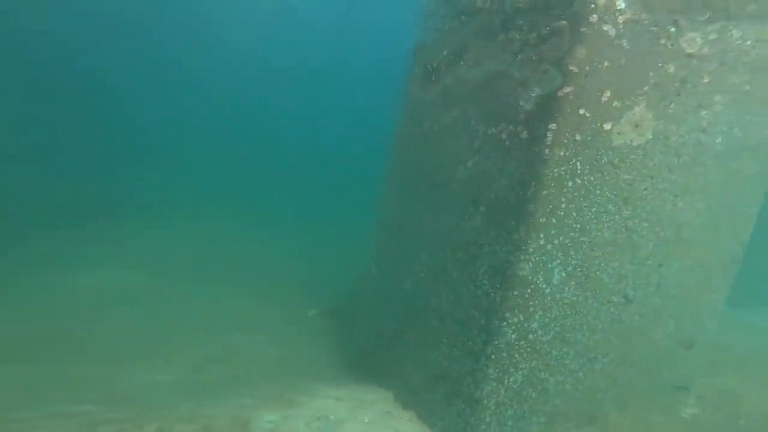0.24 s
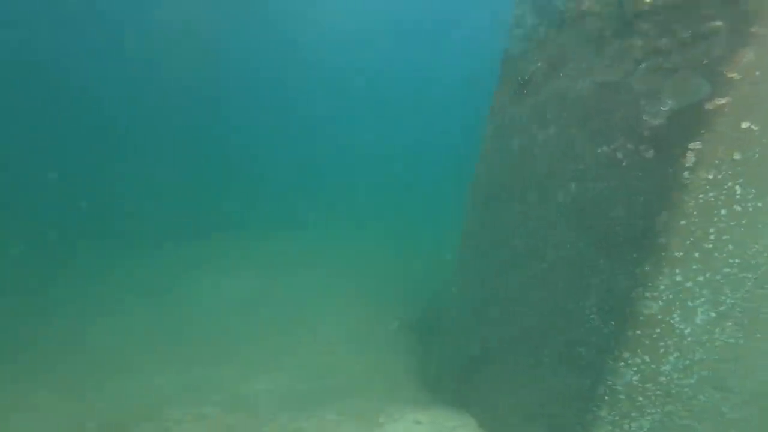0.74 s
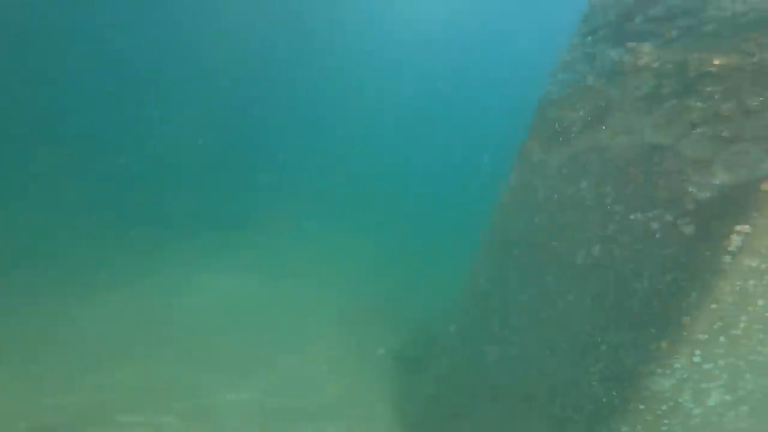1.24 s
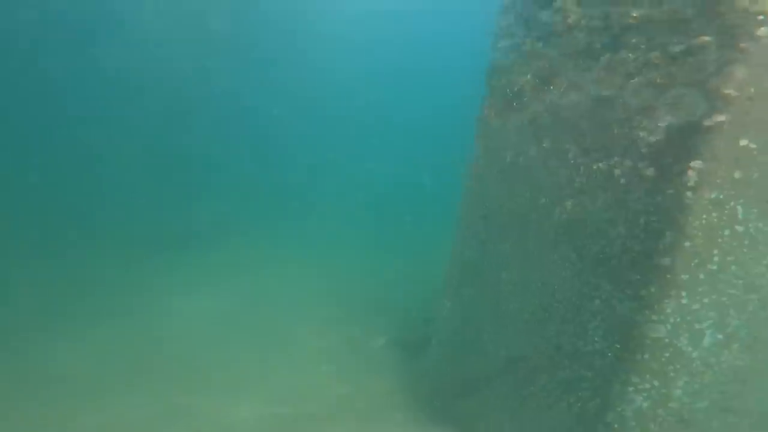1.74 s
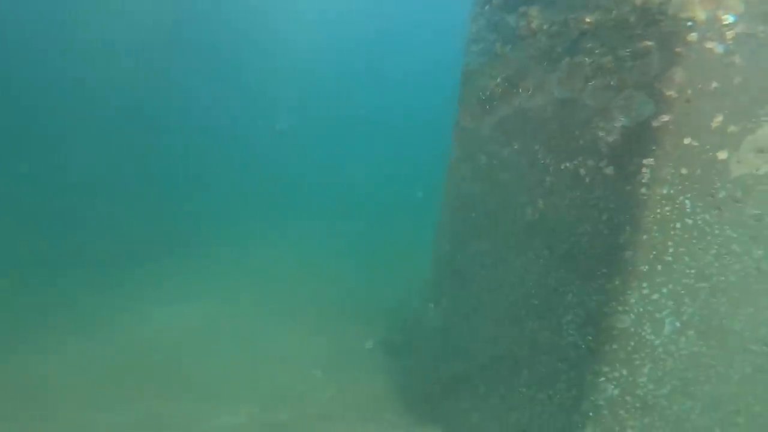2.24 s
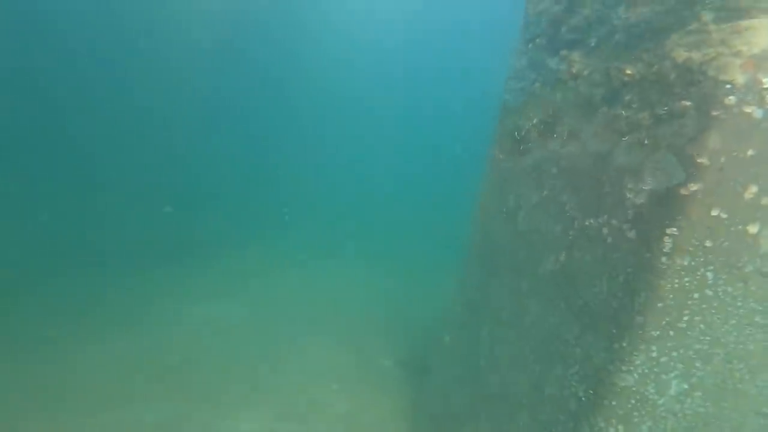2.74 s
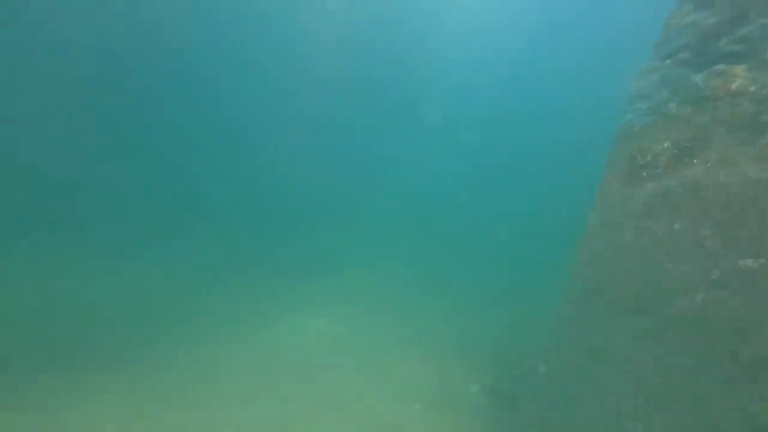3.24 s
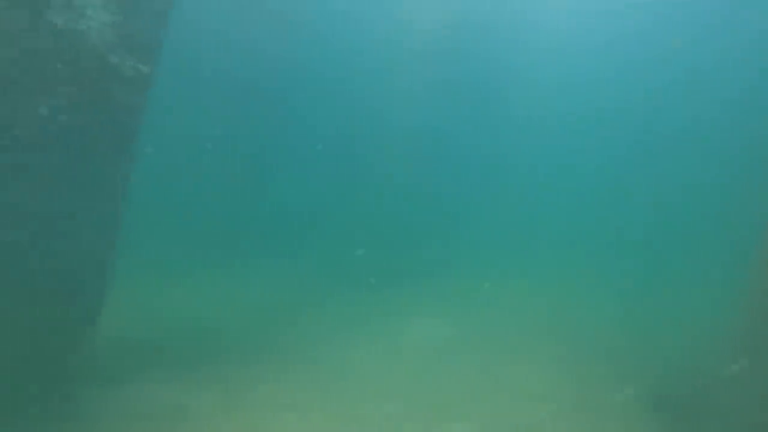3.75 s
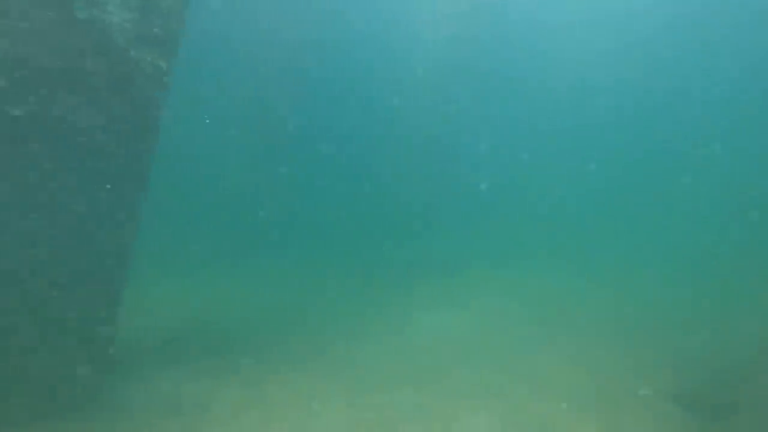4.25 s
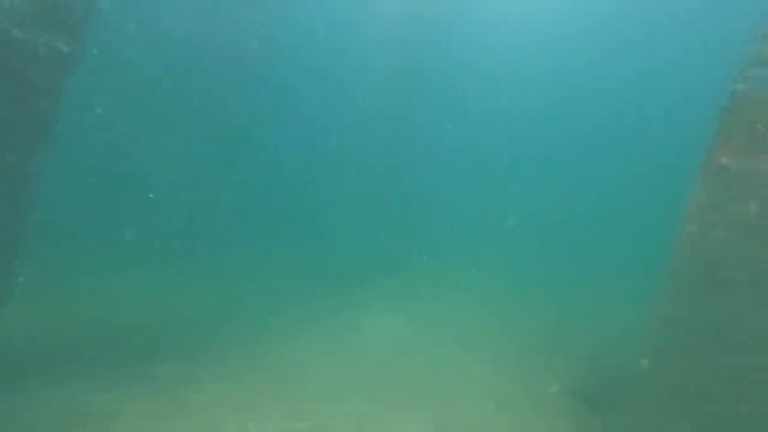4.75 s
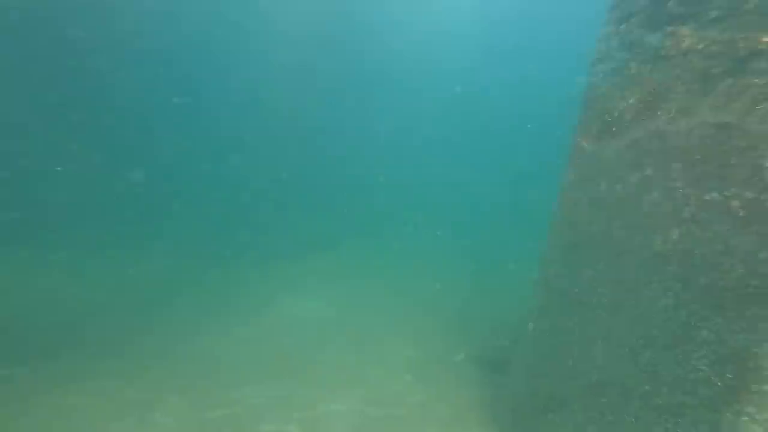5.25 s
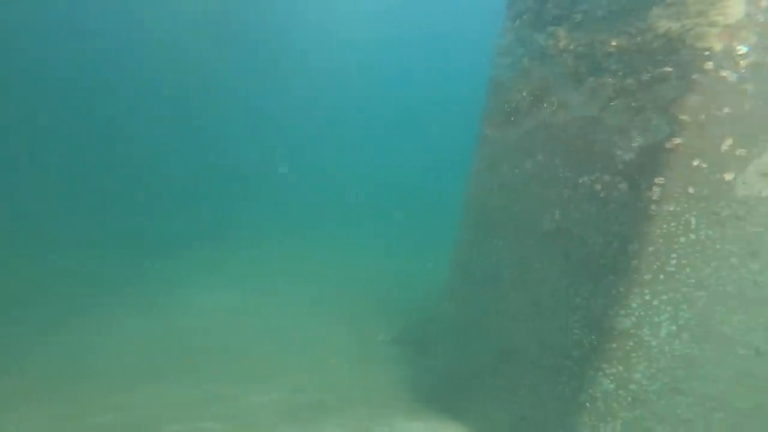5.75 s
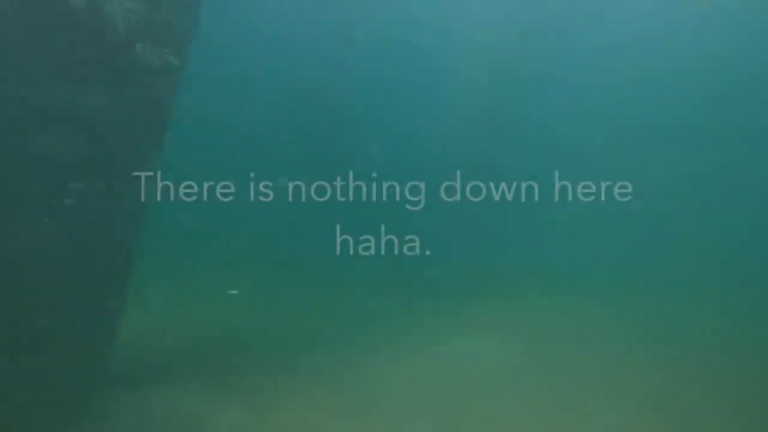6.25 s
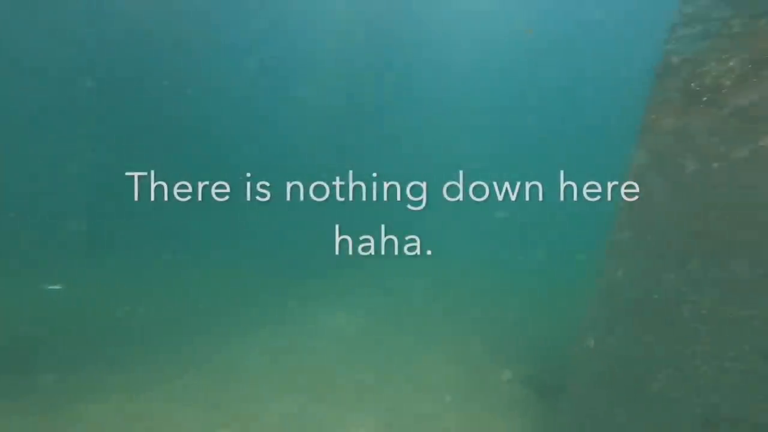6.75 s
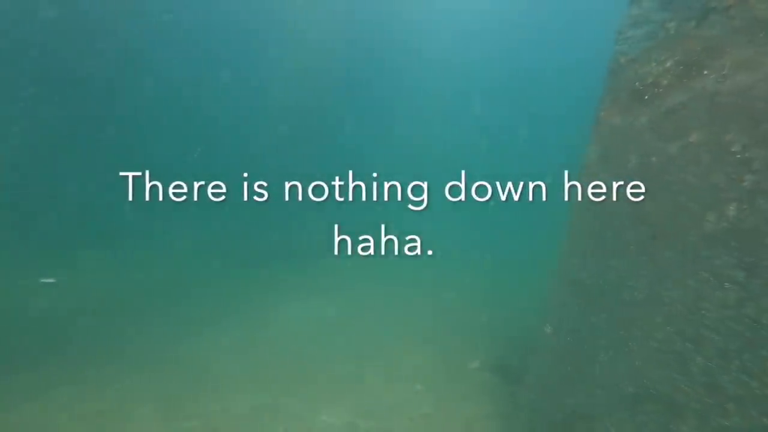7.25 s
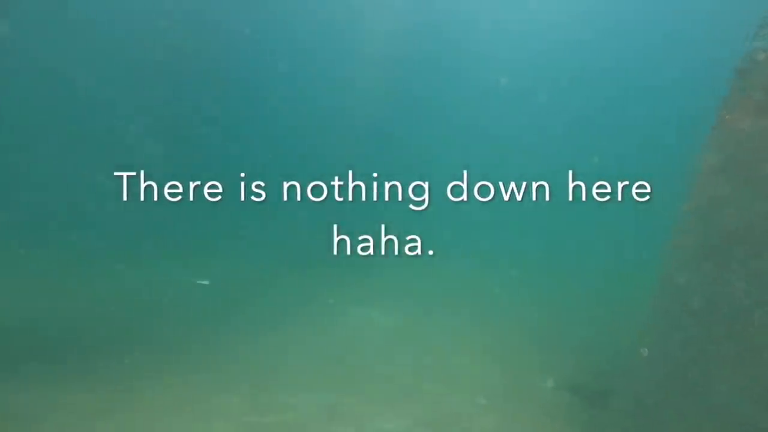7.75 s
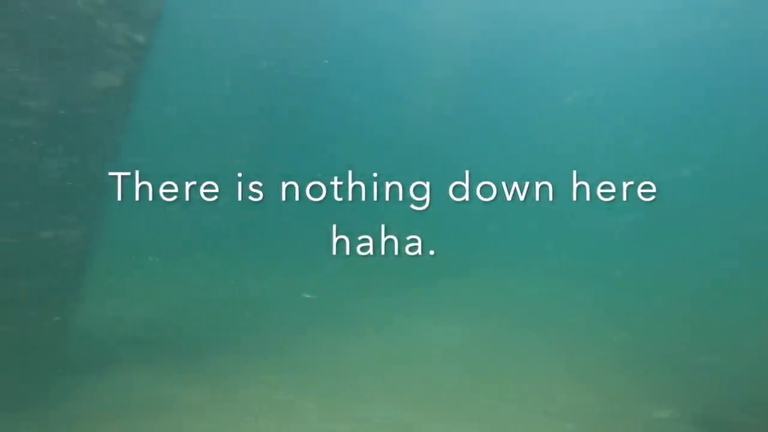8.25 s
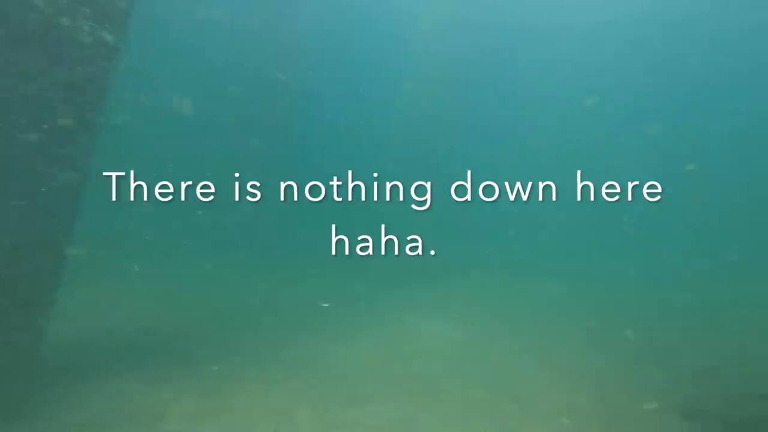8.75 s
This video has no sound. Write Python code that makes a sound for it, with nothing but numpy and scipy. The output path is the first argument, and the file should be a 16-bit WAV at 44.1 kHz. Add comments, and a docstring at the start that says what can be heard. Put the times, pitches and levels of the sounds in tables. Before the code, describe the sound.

Snapping shrimp crackle irregularly over a dull underwater hum, while occasional hollow knocks ring from a pier pile and water thumps the microphone.

```python
"""Under water beside a pier pile, heard from inside a small camera's flooded housing.
Snapping shrimp crack near and far, each impulse trailing echoes off piles, sand and surface,
and distant snaps and waves merge into a drone and a hiss. Dull knocks excite the modes of the pile,
and the swell presses on the ports. The housing acts as a filter: it muffles the sound and gives
each of three microphones its own colour and delay."""
import sys
import numpy as np
from scipy import signal
from scipy.fft import rfft, irfft, next_fast_len
from scipy.io import wavfile
from scipy.ndimage import uniform_filter1d, map_coordinates

SR = 44100
rng = np.random.default_rng(int(sys.argv[2]) if len(sys.argv) > 2 else 0)


def transcribe(u):
    """Save the signal u as a 16-bit wav file named by the first command-line argument.

    u: samples, shape (n,) or (channels, n), limited to [-1, 1]; the rate is SR.
    q: integer samples, one column per channel.
    """
    v = np.clip(np.atleast_2d(u).T, -1, 1)
    q = np.round(v * 32767).astype(np.int16)
    wavfile.write(sys.argv[1], SR, q)


N = 396900  # 9 s

# Response of the housing. Each row: frequency in Hz, left gain in dB, right gain in dB,
# phase lead of right over left in radians, gain of the third microphone in dB.
HOUSING = [(101, -11.5, -23.5, 0.22, -6), (285, -6.5, -19, 0.46, -7.5), (439, 7.5, -10.5, 3.87, 2.5),
           (550, -0.5, -8, 3.98, -2), (722, 0, -0.5, 4.62, -14.5), (862, -14, -8.5, 4.16, -17.5),
           (1105.4, -26, -25, 9.34, -29), (1375, -36.5, -30, 12.1, -31.5), (1520, -38.5, -38, 11.56, -30.5),
           (1740, -41, -29.5, 10.4, -39.5), (2090, -37, -39.5, 11.7, -41), (2410, -47.5, -38.5, 12, -52),
           (2770, -58, -43.5, 9.6, -40.5), (3500, -46, -40.5, 11.34, -46), (3900, -47.5, -36, 9.5, -43.5),
           (4640, -59.5, -45, 14.3, -45.5), (5700, -52.5, -62, 14.65, -48.5),
           (7700, -68.5, -63.5, 15.4, -54.5), (9300, -75, -73, 16, -60.5), (12900, -82.5, -75.5, 36, -76.5)]
# Lag of the third microphone behind the right. Each row: frequency in Hz, phase in radians.
THIRD_PHASE_LAG = [(130, -2), (430, 2.5), (700, 2.5), (1150, 7.5), (3000, 5.5), (12000, 7.5)]
# Crossfade from the ports to the sheltered third microphone. Each row: time in seconds, share from 0 to 1.
THIRD_SHARE = [(0, 0.09), (3.75, 0.14), (4.1, 0.85), (4.5, 0.77), (4.7, 0.75), (5.3, 0.57), (6.05, 0.53),
               (6.15, 0.18), (9, 0.14)]
# Distant water. Each row: time in seconds, drone level in dB, hiss level in dB.
FAR_WATER = [(0.0, -46.5, -65), (0.3, -45, -72), (2.23, -50.5, -68), (2.68, -46.5, -70.5), (3.46, -44, -70),
             (4.64, -49.5, -72), (4.79, -49, -67.5), (5.91, -47, -73), (6.19, -49, -70), (6.52, -49, -70.5),
             (8.67, -44, -69.5), (9.0, -46, -68.5)]
# Swell on the ports. Each row: time in seconds, level of the louder side in dB, left minus right in dB.
SWELL_LEVELS = [(0.0, -74, 4), (0.68, -74, 4.5), (0.97, -78.5, -16.5), (2.48, -78, 19.5), (3.06, -77, 8),
                (3.33, -60, 24), (3.53, -43.5, 24), (3.93, -74.5, 3.5), (9.0, -84, 4.5)]
# Pressure spectrum of the swell. Each row: frequency in Hz, relative spectral density in dB.
SWELL_SPECTRUM = [(12, -36.5), (20, 8), (38, 1), (59, 5), (75, -15.5), (140, -6.5), (180, -50.5),
                  (310, -120)]
# Water bumping the housing. Each row: start in seconds, level in dB, frequency in Hz, T60 in seconds.
WATER_BUMPS = [(0.971, -33, 27.6, 0.17), (1.199, -47.5, 90, 0.26), (1.606, -40.5, 108.5, 0.38),
               (2.513, -44, 76, 0.13), (2.679, -48.5, 35, 0.34), (3.043, -31.5, 105, 0.13),
               (3.396, -19, 45.7, 0.26), (3.462, -9, 56.4, 0.078), (3.708, -33, 46, 0.19),
               (4.097, -41.5, 120, 0.24), (5.276, -39, 92.3, 0.3), (5.928, -37, 116, 0.083),
               (6.029, -29.5, 144, 0.066), (6.334, -24.5, 100, 0.12), (6.404, -30.5, 90, 0.29),
               (7.819, -40.5, 109, 0.12)]
# Modes of the pile. Each row: frequency in Hz, relative level in dB, T60 in seconds.
PILE_MODES = [(188.4, 1, 0.079), (225.4, -3, 0.073), (276.4, -5.5, 0.12), (338.4, 2.5, 0.045),
              (391.6, 7.5, 0.048), (423.8, 1.5, 0.089), (448.8, 5, 0.092), (593, 13, 0.058),
              (686, 19.5, 0.028), (787, 11.5, 0.036)]
# Knocks in the pier. Each row: start in seconds, level in dB, pitch in Hz.
PIER_KNOCKS = [(0.43, -23.5, 230), (1.595, 1, 347), (1.604, -7, 444), (1.614, -7.5, 437),
               (1.641, -23.5, 438), (1.643, -16.5, 270), (1.994, -26.5, 329), (2.529, -26.5, 389),
               (3.917, -17, 375), (3.921, -26.5, 189), (4.001, -18.5, 394), (4.316, -26.5, 457),
               (5.261, 0.5, 435.4), (5.28, -5, 289), (5.296, -5.5, 275), (5.312, -14.5, 402),
               (6.313, 2, 409.4), (6.316, -10.5, 326), (6.328, -7.5, 350), (6.343, -12, 445),
               (6.35, -16.5, 303.6), (7.917, -18, 407), (7.921, -16, 210.8), (7.953, -17.5, 336)]
# Near snaps. Each row: start in seconds, base level of the edge (above about 2.5 kHz) in dB,
# level of the middle (about 1-2.5 kHz) in dB relative to the edge.
NEAR_SNAPS = [(0.0358, -54.5, 5.5), (0.0912, -49, -5), (0.1376, -55, 7.5), (0.1958, -48, -1),
              (0.2234, -52, -7), (0.2782, -57, -16.5), (0.4815, -52, -4), (0.5439, -51.5, -2.5),
              (0.702, -45, -4), (0.741, -51, 0), (0.8178, -43, 1.5), (1.0138, -56, 3.5), (1.0985, -57, 6),
              (1.1298, -58.5, -11), (1.179, -56, -12.5), (1.263, -52.5, -4.5), (1.225, -56, 0),
              (1.2407, -47.5, -3.5), (1.319, -51.5, 0.5), (1.428, -64, 9), (1.4497, -46, 9),
              (1.5028, -46.5, -2), (1.5731, -45.5, 1), (1.6123, -44.5, -1.5), (1.7894, -54.5, 9.5),
              (1.8426, -64.5, 14), (1.8834, -61, 4.5), (1.9337, -56.5, -0.5), (1.963, -57, -17.5),
              (1.9985, -47.5, 3), (2.0195, -53.5, 10), (2.0452, -46, 5), (2.093, -57.5, 11.5),
              (2.153, -54.5, 11), (2.1791, -48, -9), (2.2792, -45, 3), (2.303, -49.5, -9), (2.359, -57, 10),
              (2.4161, -46.5, 4), (2.4988, -49.5, 5.5), (2.5566, -42.5, -5.5), (2.6688, -53.5, -10.5),
              (2.7776, -58, -2.5), (2.809, -45, -1.5), (2.8545, -45, 1.5), (2.9748, -52.5, 5.5),
              (2.9992, -45, -2.5), (3.0608, -54, 6.5), (3.1599, -54, 3.5), (3.2449, -62, 12.5),
              (3.266, -55.5, 6.5), (3.3935, -50, -13.5), (3.4152, -47.5, 0.5), (3.448, -51, 2.5),
              (3.5058, -58, 1.5), (3.5608, -50, -1.5), (3.6643, -51.5, 0), (3.768, -54.5, 6.5),
              (3.7784, -46, -9), (3.8106, -52, -2), (3.8286, -51, 1), (3.9422, -50, -3.5), (3.977, -52, -7),
              (4.0207, -56, 2), (4.0774, -51.5, -7), (4.0974, -41.5, 3), (4.1325, -64.5, 3),
              (4.254, -67, 7), (4.2774, -59, 2.5), (4.2904, -54, 1), (4.3222, -52, 8.5),
              (4.3734, -46.5, -6.5), (4.633, -60, 9.5), (4.664, -60.5, 0), (4.679, -47.5, -5),
              (4.6864, -50, -4), (4.7093, -42.5, -12), (4.7431, -49.5, 4), (4.784, -56, -22.5),
              (4.7943, -42.5, -8.5), (4.867, -71.5, 25.5), (4.879, -61, 10), (4.9051, -40, 6),
              (4.934, -52.5, -3), (4.949, -49.5, -2), (4.9873, -51, 8.5), (5.016, -52, 8),
              (5.0828, -57.5, -11), (5.101, -59, -4.5), (5.209, -63, 7.5), (5.217, -58, 9.5),
              (5.2573, -45.5, 4), (5.307, -49, 1.5), (5.3918, -49, 3), (5.436, -63.5, 2.5),
              (5.4438, -57, -9.5), (5.471, -64, 1), (5.5274, -70, 10), (5.5925, -59, -3.5),
              (5.6064, -63, 6.5), (5.6925, -64.5, 5.5), (5.7495, -66.5, 4.5), (5.797, -65.5, 1.5),
              (5.877, -66, -17), (5.9124, -54, -4.5), (5.9238, -49.5, -6), (5.971, -38, 2.5),
              (6.0311, -61.5, 2.5), (6.0418, -54, -2), (6.1222, -44.5, -5), (6.141, -46.5, -8.5),
              (6.1654, -59, -2.5), (6.188, -47.5, 6), (6.2084, -52.5, 4), (6.2237, -54, 2.5),
              (6.245, -57.5, -1.5), (6.2578, -52, -8.5), (6.275, -58.5, 10), (6.309, -57, 8),
              (6.3205, -42.5, -4.5), (6.3564, -56.5, 13.5), (6.476, -49, -6.5), (6.6239, -62.5, 7),
              (6.718, -59, -14), (6.8582, -47, -6), (6.937, -53, -1), (7.04, -41.5, -4), (7.0786, -52, 6.5),
              (7.1071, -55.5, 7), (7.1623, -54, 0), (7.2583, -67.5, 7.5), (7.2715, -56, 13),
              (7.323, -50, 9), (7.384, -65.5, 14), (7.4176, -66.5, 16), (7.545, -54, -4),
              (7.606, -67.5, 12.5), (7.755, -59.5, 0), (7.701, -56.5, -1.5), (7.7068, -52, 4),
              (7.8133, -42, -6), (7.89, -64.5, -1), (7.903, -48, -1), (7.928, -50.5, 1.5),
              (7.965, -57, -19), (7.9785, -45, -1), (7.9866, -35.5, -5.5), (8.066, -61, 14),
              (8.158, -54, -1), (8.2483, -52.5, -2.5), (8.3179, -45.5, 3.5), (8.389, -51, -12.5),
              (8.432, -60.5, 16), (8.4928, -53.5, 11.5), (8.514, -52.5, -13.5), (8.5402, -50.5, -12.5),
              (8.593, -45, -2.5), (8.6743, -50, -5.5), (8.6949, -47.5, -14), (8.734, -48, 4.5),
              (8.7785, -52.5, 1), (8.847, -49, 3)]
# The impulse that opens a snap. Each entry: band name, gain in dB over the snap's level in that band.
POP_GAIN_DB = {"body": 24, "low": 24, "high": 23, "edge": 20, "air": 14}

TAPS = 8192  # length of the housing's impulse response


def amp(db):
    """Level in decibels as an amplitude ratio."""
    return 10 ** (np.asarray(db) / 20)


def unit(x):
    """Normalisation to an rms of one."""
    return x / np.sqrt(np.mean(x ** 2) + 1e-20)


def log_interp(knots_hz, values, hz):
    """Interpolation on a logarithmic frequency axis."""
    return np.interp(np.log(hz + 1), np.log(np.asarray(knots_hz) + 1), values)


def curves(rows):
    """Linear interpolation in time: one value per sample for each column after the first."""
    times, *columns = np.transpose(rows)
    return [np.interp(np.arange(N) / SR, times, column) for column in columns]


def wobble(rate):
    """Smooth random modulation: a spline through `rate` Gaussian knots a second."""
    return map_coordinates(rng.standard_normal(int(N * rate / SR) + 4), [np.arange(N) * rate / SR])


def filtered(x, response):
    """Linear filtering: the spectrum of x is multiplied by a complex frequency response."""
    size = next_fast_len(N + TAPS)
    return irfft(rfft(x, size) * response(np.fft.rfftfreq(size, 1 / SR)), size)[..., :N]


def microphones(hz):
    """Transfer functions of the left, right and third microphones, relative to the left."""
    knots_hz, left_db, right_db, right_lead, third_db = np.transpose(HOUSING)
    lead = log_interp(knots_hz, right_lead, hz)
    phases = [0 * hz, lead, lead - log_interp(*np.transpose(THIRD_PHASE_LAG), hz)]
    return np.array([amp(log_interp(knots_hz, db - left_db, hz)) * np.exp(1j * phase)
                     for db, phase in zip((left_db, right_db, third_db), phases)])


def muffled(x, lo_hz, hi_hz):
    """One band of x at the right port. The filter is minimum phase: ringing follows the excitation."""
    hz = np.fft.rfftfreq(TAPS, 1 / SR)
    knots_hz, _, right_db = np.transpose(HOUSING)[:3]
    band = 1 / np.sqrt((1 + (lo_hz / (hz + 1)) ** 10) * (1 + (hz / hi_hz) ** 10))
    gain = amp(log_interp(knots_hz, right_db, hz)) * band
    port_mean = gain * (1 + 1 / microphones(hz)[1]) / 2
    gain = gain / np.sqrt(np.mean(np.abs(port_mean) ** 2))
    cepstrum = irfft(np.log(gain + 1e-6))
    causal_fold = np.r_[1, np.full(TAPS // 2 - 1, 2), 1, np.zeros(TAPS // 2 - 1)]
    return signal.fftconvolve(x, irfft(np.exp(rfft(cepstrum * causal_fold))))[:N]


def sides(db, pan_db):
    """Level difference between the ports: left and right gains, with the louder side at db."""
    return amp([db + np.minimum(pan_db, 0), db - np.maximum(pan_db, 0)])


def far_water():
    """Incoherent summation: countless distant snaps and waves blur into a lumpy drone and faint hiss."""
    drone_db, hiss_db = curves(FAR_WATER)
    drone = amp(drone_db + 2.0 * wobble(6.4) + 2.68 * wobble(40)) * rng.standard_normal(N)
    hiss = amp(hiss_db + 1.4 * wobble(8) + 4.4 * wobble(90)) * rng.standard_normal(N)
    return muffled(drone, 150, 701) + muffled(hiss, 1103, 9800)


def swell():
    """Slow pressure fluctuations, uncorrelated at the two ports, with damped bumps on the swell's side."""
    level_db, pan_db = curves(SWELL_LEVELS)
    noise = rng.standard_normal((2, N))
    pressure = unit(filtered(noise, lambda hz: amp(log_interp(*np.transpose(SWELL_SPECTRUM), hz))))
    out = np.pad(pressure * sides(level_db + 3 * wobble(1.3), pan_db), ((0, 0), (0, SR)))
    t = np.arange(SR // 2) / SR
    for start, db, hz, t60 in WATER_BUMPS:
        churn = 2.0 * wobble(30)[:len(t)]  # churning water keeps the pitch unsteady
        envelope = amp(-60 * t / t60) * (1 - np.exp(-18 * t / t60)) ** 2
        bump = np.sin(2 * np.pi * hz * t + churn) * envelope
        onset = round(start * SR)
        out[:, onset:][:, :len(t)] += sides(db, pan_db[onset])[:, None] * bump
    return out[:, :N]


def pile_knocks(reach_octaves=0.1, spill_db=-25):
    """Modal resonance: a knock rings the modes near its pitch, then scatters into a duller rumble."""
    out, t = np.zeros(N + SR), np.arange(SR // 2) / SR
    dull = signal.butter(3, [200, 500], "band", fs=SR, output="sos")
    mode_hz, mode_db, t60 = np.transpose(PILE_MODES)[..., None]
    modes = np.sin(2 * np.pi * mode_hz * t) * amp(mode_db - 60 * t / t60)
    rise = 1 - np.exp(-t / 0.0061)
    for start, db, hz in PIER_KNOCKS:
        nearness = np.exp(-(np.log2(mode_hz / hz) / reach_octaves) ** 2)
        excitation = nearness / nearness.sum() + amp(spill_db)  # a little spills into every mode
        ring = np.sum(excitation * modes, axis=0)
        scatter = unit(signal.sosfilt(dull, rng.standard_normal(len(t)))) * amp(-20.5 - 60 * t / 0.22)
        out[round(start * SR):][:len(t)] += amp(db) * rise * (ring + scatter)
    return signal.sosfilt(signal.butter(2, [110, 1000], "band", fs=SR, output="sos"), out[:N])


def echo_grain(grain_db=5, patch_db=4):
    """Noise modulated in time and frequency: each echo has a fine grain and favours its own bands."""
    grainy = amp(grain_db * wobble(250)) * rng.standard_normal(N)
    spectra = signal.stft(grainy, nperseg=256)[2]
    patches = uniform_filter1d(rng.standard_normal(spectra.shape), size=3, axis=0)
    patches = uniform_filter1d(patches, size=10, axis=1)
    return unit(signal.istft(spectra * amp(patch_db * unit(patches)), nperseg=256)[1][:N])


def snaps(starts, db, band, crack_t60, echo_db, echo_t60):
    """Impulse and reverberation: a pop, a dense crack, echoes and a wash. Overlaps add in power."""
    crack_db, hold_s = -7, 0.0033
    wash_db, wash_t60 = -26, 0.2  # long reverberation under the pier
    noise = echo_grain()
    t = np.arange(SR // 2) / SR
    crack_power = amp(2 * crack_db - 120 * np.maximum(t - hold_s, 0) / crack_t60)[:SR // 20]
    tail_power = amp(2 * echo_db - 120 * t / echo_t60) + amp(2 * wash_db - 120 * t / wash_t60)
    tail_power *= 1 - np.exp(-t / hold_s)
    onset_power = np.bincount((starts * SR).astype(int), amp(2 * db), N)[:N]
    crack, tail = (np.sqrt(np.abs(signal.oaconvolve(onset_power, power)[:N]))
                   for power in (crack_power, tail_power))
    pop = amp(POP_GAIN_DB[band]) * np.sqrt(onset_power)
    return pop + np.sign(noise[::-1]) * crack + noise * tail


def snap_arrivals(reflections=5, far_count=1400):
    """Multipath propagation: times and levels of near snaps, their echoes off piles, and far snaps."""
    starts, edge_db, middle_re_edge = np.transpose(NEAR_SNAPS)
    middle_db = edge_db + middle_re_edge
    direct_db = np.array([middle_db + 9, middle_db, edge_db])  # body, middle, edge
    detour, loss = rng.random((len(starts), reflections, 2)).transpose(2, 0, 1)
    reflected_starts = starts[:, None] + .003 + .04 * detour ** 1.5
    reflected_db = direct_db[..., None] - 16 - 9 * loss - 6 * detour
    when, strength, body, edge = rng.random((far_count, 4)).T
    far_onsets = when * (N - 1)
    hiss_db = curves(FAR_WATER)[1][far_onsets.astype(int)]  # the far crowd swells with the hiss
    far_db = hiss_db - 9 + 9 * strength ** 3
    crowd_db = [far_db + 22.5 + 6 * body, far_db, far_db - 16.5 + 8 * edge]
    return (np.r_[starts, reflected_starts.ravel(), far_onsets / SR],
            np.c_[direct_db, reflected_db.reshape(3, -1), crowd_db])


def shrimp(direct_colour=0.28, top_tilt=0.81, top_loss_db=16.5):
    """Broadband snaps in five bands. Transmission depends on frequency, so each path has its colour."""
    starts, (body_db, middle_db, edge_db) = snap_arrivals()
    indirect = np.arange(len(starts)) >= len(NEAR_SNAPS)
    colour = np.where(indirect, 1, direct_colour)
    lean_db, top_lean_db = 2.6 * rng.standard_normal((len(starts), 2)).clip(-2, 2).T * colour
    low_db = middle_db + 6.5 + lean_db / 2
    high_db = (middle_db + edge_db) / 2 - 4 - lean_db / 2
    # snaps thin in the middle are the bright ones; reflected and far paths lose the top
    air_db = edge_db - 32 - top_tilt * (middle_db - edge_db) - top_loss_db * indirect + top_lean_db
    body = snaps(starts, body_db, "body", crack_t60=0.013, echo_db=-11, echo_t60=0.066)
    low = snaps(starts, low_db, "low", crack_t60=0.027, echo_db=-3, echo_t60=0.12)
    high = snaps(starts, high_db, "high", crack_t60=0.026, echo_db=-3.5, echo_t60=0.086)
    edge = snaps(starts, edge_db - 10, "edge", crack_t60=0.0082, echo_db=-6.5, echo_t60=0.09)
    air = snaps(starts, air_db, "air", crack_t60=0.011, echo_db=-13, echo_t60=0.21)
    return (muffled(body, 400, 1050) + muffled(low, 1050, 1800) + muffled(high, 1800, 3000)
            + muffled(edge, 3000, 5600) + muffled(air, 5600, 10500))


def scene():
    """Superposition: the housing shakes as one, and its ports are crossfaded with the third microphone."""
    waterborne = filtered(shrimp() + far_water(), lambda hz: microphones(hz) / microphones(hz)[1])
    left, right, third = waterborne + filtered(pile_knocks(), microphones)
    stray = amp(-15) * np.roll(right, 500)  # a weak second path to the right port, 11 ms late
    share = curves(THIRD_SHARE)[0]
    return (1 - share) * np.array([left, right + stray]) + share * third + swell()


def record(dry, cutoff_hz=15800):
    """Band limiting: the camera acts as an ideal low-pass filter."""
    return filtered(dry, lambda hz: hz < cutoff_hz)


dry = scene()
out = record(dry)
transcribe(out)
```